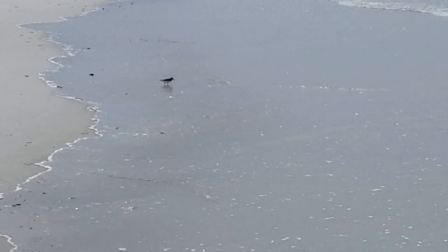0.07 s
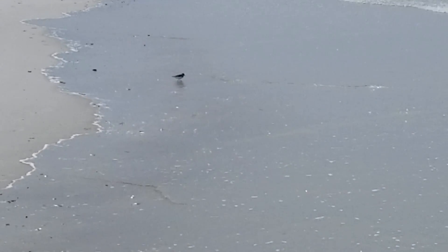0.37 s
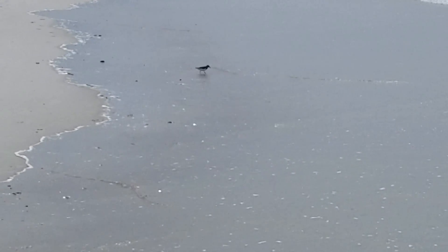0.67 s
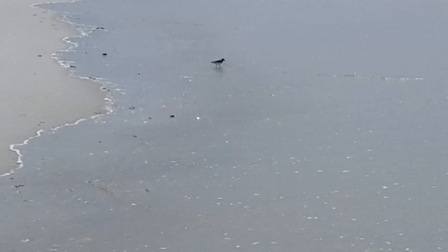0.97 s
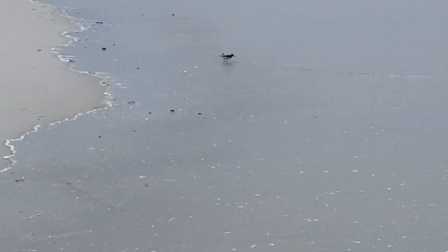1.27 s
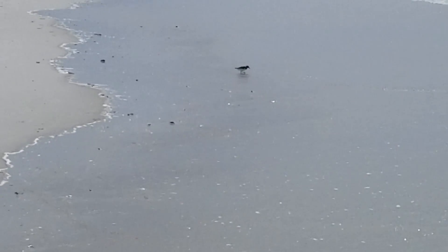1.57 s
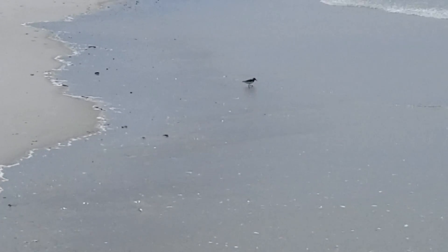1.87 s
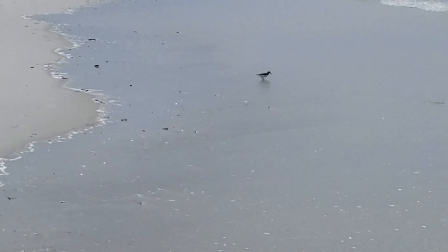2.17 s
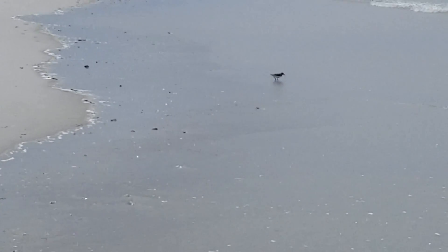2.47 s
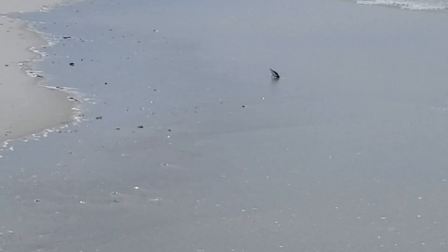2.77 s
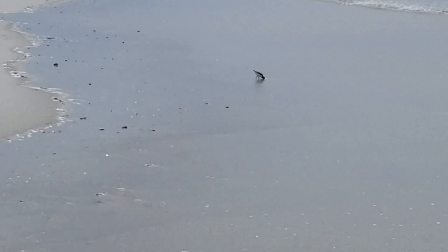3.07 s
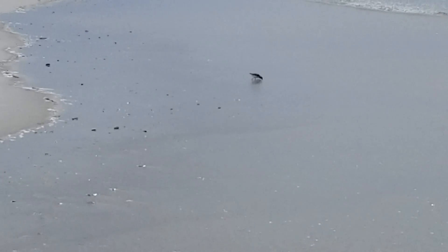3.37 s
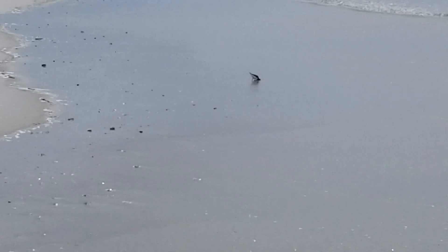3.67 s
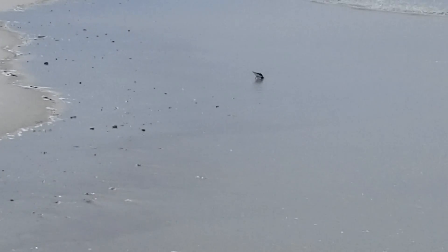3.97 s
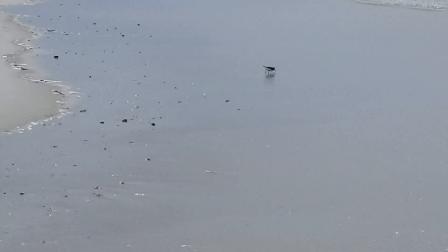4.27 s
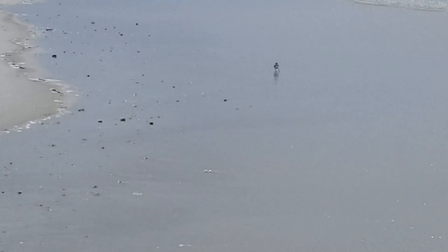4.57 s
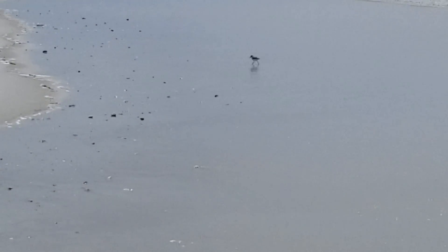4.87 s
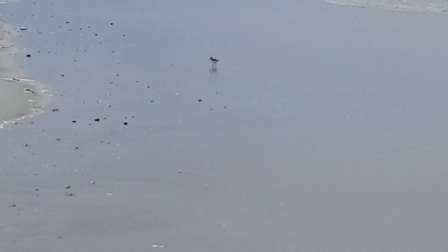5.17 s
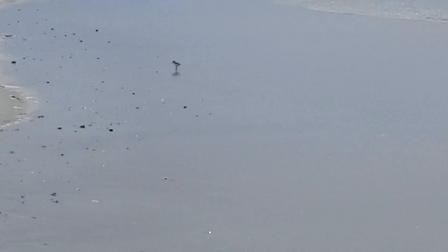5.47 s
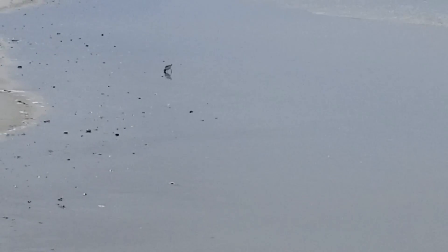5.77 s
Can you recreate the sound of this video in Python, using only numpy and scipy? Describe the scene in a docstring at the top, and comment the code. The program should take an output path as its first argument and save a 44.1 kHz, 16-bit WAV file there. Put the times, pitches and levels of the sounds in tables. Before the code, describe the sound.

On a sandy beach, gusty wind buffets the microphone with a low rumble, rough flutter and sudden thuds, over a steady wash of surf. About halfway through, the wind drops sharply and the sea softens a little. The surf then returns louder, with a faint foamy hiss and a few small waves spilling, while lighter gusts keep brushing the microphone.

```python
"""Gusty wind on a sandy beach buffets a camera's two microphone ports over the steady wash of surf.
Turbulence makes the pressure at the ports fluctuate: big eddies rumble, faster ones flutter and tear,
and the sharpest arrive as single thuds. The wind and surf both drop in level after three seconds;
then the wash returns louder, with small waves spilling, under a lighter wind."""
import sys
import numpy as np
from scipy import signal
from scipy.fft import rfft, irfft, next_fast_len
from scipy.io import wavfile
from scipy.ndimage import uniform_filter1d, minimum_filter1d, map_coordinates

SR = 44100
rng = np.random.default_rng(int(sys.argv[2]) if len(sys.argv) > 2 else 0)


def transcribe(u):
    """Save the signal u as a 16-bit wav file named by the first command-line argument.

    u: samples, shape (n,) or (channels, n), limited to [-1, 1]; the rate is SR.
    q: integer samples, one column per channel.
    """
    v = np.clip(np.atleast_2d(u).T, -1, 1)
    q = np.round(v * 32767).astype(np.int16)
    wavfile.write(sys.argv[1], SR, q)


N = 256220


def wind():
    """Turbulent pressure fluctuation: the smaller the eddy, the higher the band it excites at a port."""
    # The steady wind. Each row: time in seconds, then rumble, flutter and tearing levels in dB.
    steady_levels = [(0.0, -20.5, -25, -40), (0.65, -20.5, -26.5, -42.5), (1.1, -23.5, -28.5, -45),
                     (1.5, -23.5, -31.5, -47), (1.9, -23, -25, -40.5), (2.15, -20.5, -28, -53),
                     (2.6, -19, -22, -34.5), (2.8, -21, -20, -33.5), (3.08, -28, -23.5, -36),
                     (3.2, -37, -32.5, -37.5), (3.9, -42.5, -36, -48), (4.42, -30, -28, -35),
                     (4.7, -35, -30, -38.5), (5.15, -33, -28.5, -40.5), (5.81, -32.5, -32, -39.5)]
    # Spectra of large, medium and small eddies. Each row: frequency in Hz, relative level in dB.
    rumble_spectrum = [(12, -36), (28, -19.5), (50, -6), (80, -3), (130, -2), (200, -4.5), (300, -10.5),
                       (500, -28), (1000, -83.5)]
    flutter_spectrum = [(50, -36.5), (120, -3), (220, 1), (340, 1), (450, -3), (620, -14), (850, -21),
                        (1400, -39.5), (3000, -84.5)]
    tearing_spectrum = [(250, -47), (500, 5), (760, 1.5), (1050, -4), (1500, -12), (2300, -24.5),
                        (3400, -39.5), (6000, -51), (12000, -54)]
    light_wind_db, moderate_wind_db = -30.5, -28  # flutter levels
    dull_above_hz = 151
    rumble_gain, flow, tearing_gain = np.hypot(amp(curves(steady_levels)), gusts())  # powers add
    surge = np.tanh(wobble(48))  # the flow flips between clinging to the case and breaking away
    crackle = wobble(210)  # the smallest eddies chop the tearing into grains
    # In light wind the eddies slow down and the rumble dulls.
    brisk_share = flow ** 2 / (flow ** 2 + amp(light_wind_db) ** 2)
    lowpass = [(dull_above_hz, 0), (2 * dull_above_hz, -20)]
    dull = unit(colour(rush(rumble_spectrum, side_db=-7.5, patchy_db=2.0), lowpass))
    brisk = rush(rumble_spectrum, side_db=-9.5, patchy_db=0.0)
    body = np.sqrt(brisk_share) * brisk + np.sqrt(1 - brisk_share) * dull
    rumble = rumble_gain * body * unit(amp(1.66 * wobble(40) + 2.0 * wobble(14)))
    flutter = flow * rush(flutter_spectrum, side_db=-11.5, patchy_db=1.16)
    flutter *= unit(amp(2.34 * surge + 2.04 * crackle))
    tearing = tearing_gain * rush(tearing_spectrum, side_db=-11.5, patchy_db=1.74)
    tearing *= unit(amp(3.0 * surge + 3.9 * crackle))
    # Stronger flow favours the right port, and its direction veers at random.
    excess_db = 20 * np.log10(flow) - moderate_wind_db
    heading_db = -3.5 - 0.21 * excess_db + 0.2 * wobble(7)
    return rumble * panned(1.3)[:, None] + (flutter + tearing) * panned(heading_db)


def gusts():
    """Incoherent gusts add in power; returns their summed rumble, flutter and tearing gains."""
    # Gusts at the ports. Each row: start and length in seconds, flutter level in dB,
    # then tearing and rumble in dB relative to the flutter.
    strikes = [(0.005, 0.039, -18.5, -10, -15), (0.118, 0.024, -24, -9.5, -2),
               (0.249, 0.0052, -23.5, -5, -12), (0.308, 0.023, -21.5, -14, 0),
               (0.389, 0.045, -15, -8.5, -9), (0.537, 0.013, -23.5, -25, -8),
               (0.635, 0.054, -30, -15, 10.5), (0.758, 0.11, -13, -15.5, -14),
               (0.981, 0.027, -15.5, -12, -7), (1.213, 0.025, -18, -10.5, 3), (1.269, 0.049, -18, -10, -4),
               (1.338, 0.051, -14.5, -11.5, -5), (1.57, 0.064, -15.5, -12.5, -9),
               (1.713, 0.1, -17, -9.5, -5), (2.321, 0.046, -15.5, -15.5, -17), (2.595, 0.066, -26, -20, 6),
               (2.69, 0.021, -12, -5, -8), (4.1, 0.035, -30, -7, -2), (4.222, 0.01, -30.5, -21, -19),
               (4.382, 0.081, -29, -23, -6), (4.627, 0.012, -25, -21, -21), (5.067, 0.01, -21, -9.5, -2.5),
               (5.302, 0.016, -25.5, -8, -10), (5.412, 0.027, -24, -9, -22),
               (5.522, 0.0048, -19, -29, -7.5)]
    tear_exponent = 1.5  # tearing needs the fastest flow, so it starts and stops more abruptly
    power = np.zeros((3, N))
    for start, length, level_db, tear_db, rumble_db in strikes:
        shape = swell(start, length, attack_s=0.006, release_s=0.026)
        bands = np.array([amp(rumble_db) * shape, shape, amp(tear_db) * shape ** tear_exponent])
        power += (amp(level_db) * bands) ** 2
    return np.sqrt(power)


def eddies():
    """Pressure transients: a single eddy thuds in one short swing, and its steep front tears and snaps."""
    # Eddies that hit a port. Each row: time in seconds, relative thud and snap levels in dB.
    hits = [(0.254, 2, -29), (0.358, 0, -25.5), (0.76, 3.5, -27.5), (0.822, 4, -32), (0.986, -0.5, -45),
            (1.212, 2, -30), (1.306, 8, -32.5), (1.595, 3, -37), (1.717, 3.5, -29), (1.807, 0, -25),
            (2.71, -5, -20), (2.733, -14, -19), (2.906, -2.5, -37), (3.068, -7, -33), (3.128, -18, -29),
            (3.168, -21, -36), (3.375, -6.5, -48), (3.394, -22, -32), (3.42, -22, -31), (4.388, -2, -39),
            (4.667, -14, -26), (4.854, -4.5, -27), (5.079, -4, -45), (5.458, -22, -27.5)]
    # Spectra of the swing and of its front. Each row: frequency in Hz, relative level in dB.
    thud_spectrum = [(20, -36), (100, -0.5), (350, 8.5), (700, -9), (1300, -15), (2500, -53.5),
                     (6000, -116)]
    snap_spectrum = [(100, -32), (500, 10), (1000, 5), (1600, -2.5), (2600, -10), (3600, -20), (5000, -31),
                     (7000, -47), (16000, -70)]
    snap_delay_s, snap_decay_s = 0.001, 0.0026
    fronts, snap_gain = np.zeros(N), np.zeros(N)
    t = np.arange(N) / SR
    for start, thud_db, snap_db in hits:
        fronts[round(start * SR)] = amp(thud_db - 8.0)
        snap_gain += amp(snap_db + 5.0) * np.exp(-np.abs(t - start - snap_delay_s) / snap_decay_s)
    swing = colour(signal.unit_impulse(N), thud_spectrum)[:SR // 10]
    thuds = signal.fftconvolve(fronts, swing / np.abs(swing).max())[:N]
    snaps = snap_gain * rush(snap_spectrum, side_db=-18, patchy_db=2.0)
    return (thuds + snaps) * panned(-5.5)[:, None]


def spills():
    """Splash noise: small waves topple in short bursts, made grainy by fast amplitude modulation."""
    # Waves in the shallows. Each row: start and length in seconds, level in dB.
    waves = [(3.97, 0.16, -45.5), (4.334, 0.05, -55), (4.535, 0.064, -38), (4.908, 0.078, -36.5),
             (5.24, 0.04, -37), (5.422, 0.031, -39.5)]
    # The spectrum of a splash. Each row: frequency in Hz, relative level in dB.
    splash_spectrum = [(400, -23), (900, 4.5), (1500, -0.5), (2500, -4.5), (4000, -15), (8000, -27),
                       (16000, -42)]
    envelope = sum(amp(db) * swell(start, length, attack_s=0.01, release_s=0.022)
                   for start, length, db in waves)
    splash = rush(splash_spectrum, side_db=-9, patchy_db=4.0)
    grains = unit(amp(3.0 * wobble(150)))
    return envelope * splash * grains


def surf():
    """Comodulated noise: broken waves wash up the sand and their foam hisses, both churning together."""
    # The sea. Each row: time in seconds, relative wash and foam levels in dB.
    sea_levels = [(0.0, -45.5, -54.5), (0.63, -44.5, -53.5), (1.5, -47, -56), (2.62, -43.5, -53.3),
                  (3.28, -49, -60), (3.92, -49.5, -59), (4.36, -42, -51), (4.62, -43.5, -54),
                  (4.82, -41.5, -50), (4.98, -41.5, -53.5), (5.27, -42.5, -52), (5.81, -41.5, -52.5)]
    # Spectra of the water and its foam. Each row: frequency in Hz, relative level in dB.
    wash_spectrum = [(100, -35), (230, -3.5), (390, 20.5), (550, 13.5), (800, 7), (1350, -2.5), (1900, -.5),
                     (2450, -0.5), (2900, -3.5), (3400, -8.5), (4300, -9), (5000, -11.5), (5700, -21),
                     (14000, -55)]
    foam_spectrum = [(2500, -23), (4500, -1.5), (6400, 3), (7500, -0.5), (9000, -1.5), (11000, -0.5),
                     (12500, 1.5), (14000, -4.5), (16000, -5.5)]
    wash_db, foam_db = curves(sea_levels)
    churn_db = 0.5 * wobble(60)
    wash_gain = amp(wash_db + 10.5 + churn_db + 0.76 * wobble(11))
    wash = wash_gain * rush(wash_spectrum, side_db=-9, patchy_db=0.9)
    foam = amp(foam_db + 1.63 + churn_db) * rush(foam_spectrum, side_db=-8.5, patchy_db=1.4)
    return wash * panned(0.9)[:, None] + foam * panned(-0.23)[:, None]


def rush(spectrum, side_db, patchy_db):
    """Partly coherent stereo noise, patchy in time and frequency; the common part has rms 1."""
    cells = signal.stft(rng.standard_normal((2, N)), nperseg=512)[2]
    patches = uniform_filter1d(rng.standard_normal(cells.shape[1:]), size=6, axis=0)
    patches = uniform_filter1d(patches, size=14, axis=1)
    pair = signal.istft(cells * amp(patchy_db * unit(patches)), nperseg=512)[1][:, :N]
    mid, side = colour(pair, spectrum)
    return unit(mid) + np.outer([1, -1], amp(side_db) * unit(side))


def colour(x, spectrum):
    """Minimum-phase filtering of x, with a gain that follows the (Hz, dB) points."""
    size = 2 * next_fast_len(N // 2 + 8192)
    hz, db = np.transpose(spectrum)
    gain = amp(np.interp(np.log(np.fft.rfftfreq(size, 1 / SR) + 1), np.log(hz), db))
    cepstrum = irfft(np.log(gain))
    cepstrum[1:size // 2] *= 2  # folding onto positive time makes the filter causal
    cepstrum[size // 2 + 1:] = 0
    return irfft(rfft(x, size) * np.exp(rfft(cepstrum)), size)[..., :N]


def swell(start, length, attack_s, release_s):
    """Exponential rise to 1 at start, a hold for length seconds, then exponential decay."""
    t = np.arange(N) / SR
    return np.exp(-np.maximum(start - t, 0) / attack_s - np.maximum(t - start - length, 0) / release_s)


def wobble(rate):
    """Smooth random modulation: a spline through rate knots a second."""
    knots = rng.standard_normal(int(N * rate / SR) + 4)
    return map_coordinates(knots, [np.arange(N) * rate / SR])


def curves(rows):
    """Linear interpolation to one value per sample for each column after the time."""
    times, *columns = np.transpose(rows)
    return [np.interp(np.arange(N) / SR, times, column) for column in columns]


def panned(left_right_db):
    """A level difference between the ports, as two gains with a mean of 1."""
    gains = amp(np.array([left_right_db, -left_right_db]) / 2)
    return gains / gains.mean(axis=0)


def amp(db):
    """Decibels to amplitude ratio."""
    return 10 ** (np.asarray(db) / 20)


def unit(x):
    """Normalisation to rms 1."""
    return x / np.sqrt(np.mean(x ** 2) + 1e-20)


def scene():
    """Superposition of the wind at the ports and the sea behind it."""
    return wind() + eddies() + surf() + spills()


def record(dry):
    """Peak and band limiting: the camera eases the biggest buffets down and cuts the highest treble."""
    window_samples, top_hz = 441, 15800
    needed_gain = 1 / np.maximum(np.abs(dry).max(axis=0), 1)
    held_gain = minimum_filter1d(needed_gain, size=window_samples)
    gain = uniform_filter1d(held_gain, size=window_samples)
    size = next_fast_len(N + SR // 2)
    passband = np.fft.rfftfreq(size, 1 / SR) < top_hz
    return irfft(rfft(dry * gain, size) * passband, size)[:, :N]


dry = scene()
out = record(dry)
transcribe(out)
```